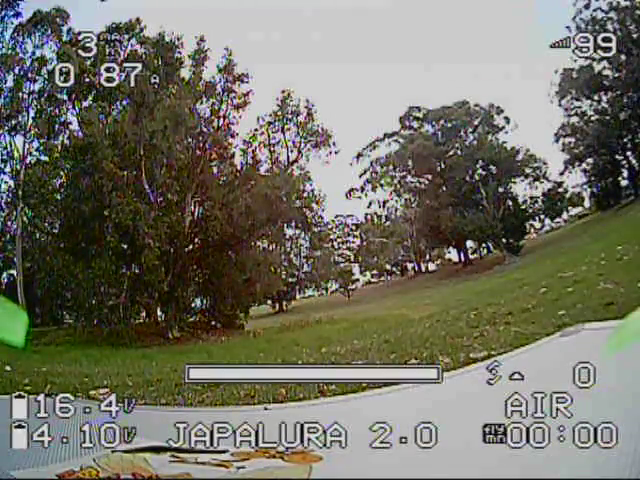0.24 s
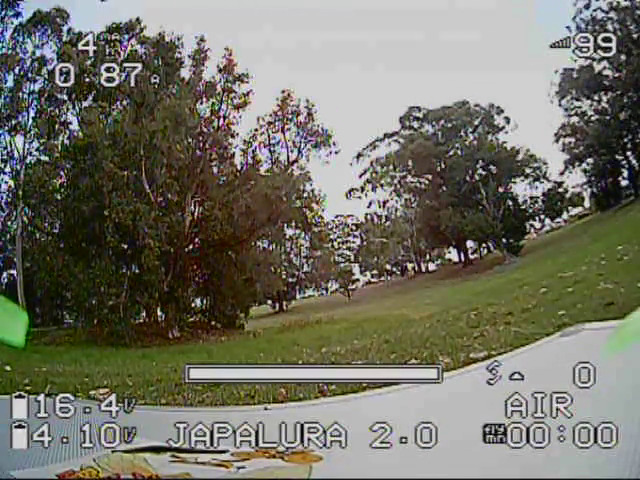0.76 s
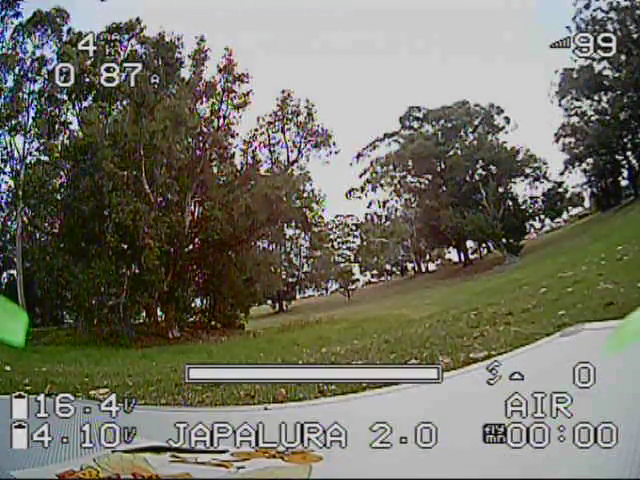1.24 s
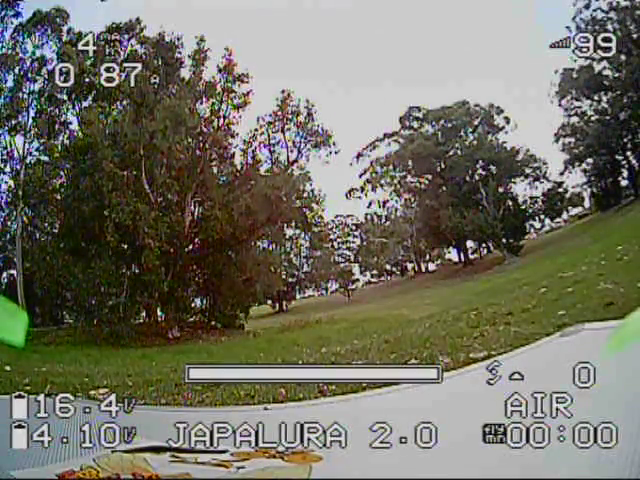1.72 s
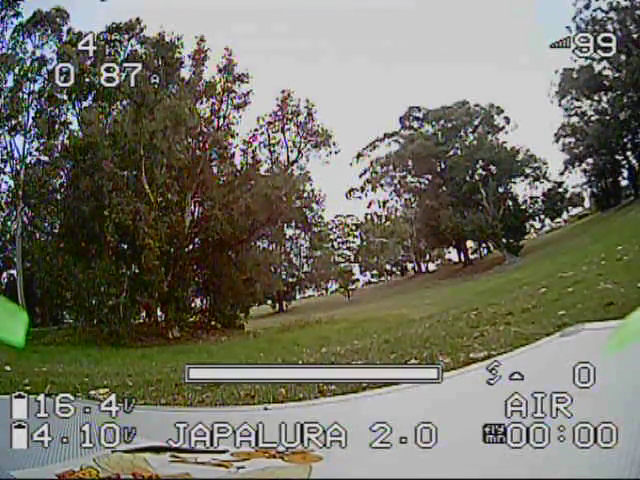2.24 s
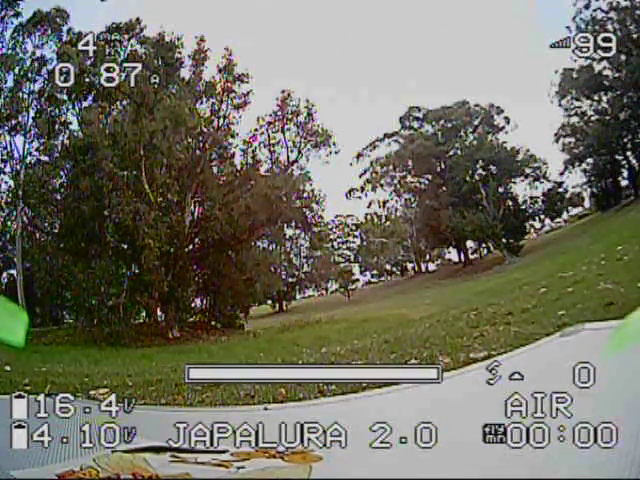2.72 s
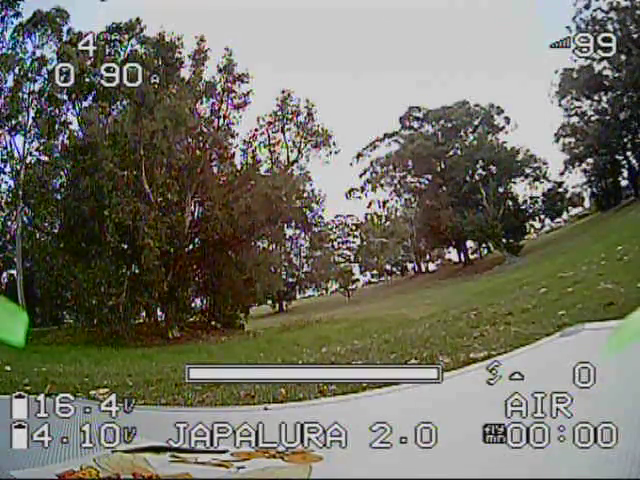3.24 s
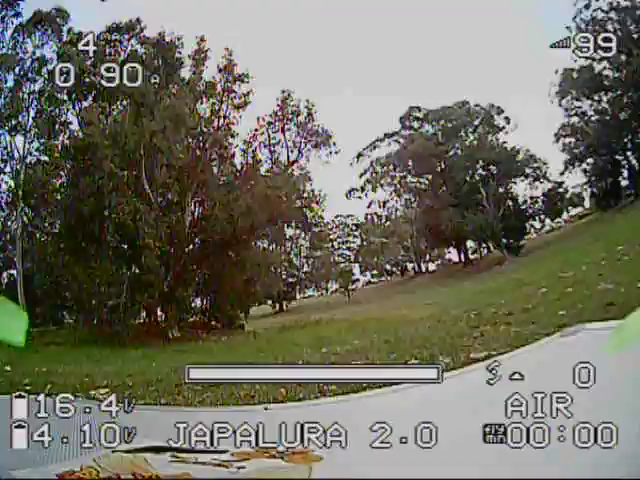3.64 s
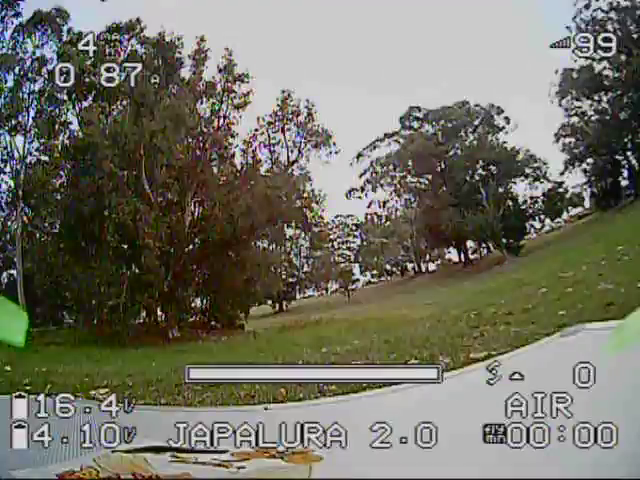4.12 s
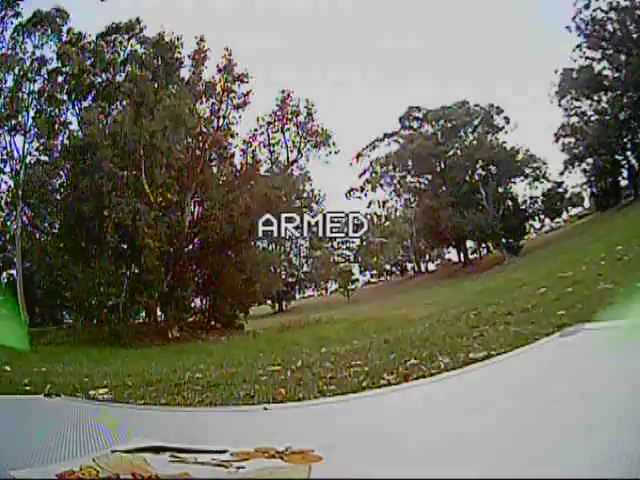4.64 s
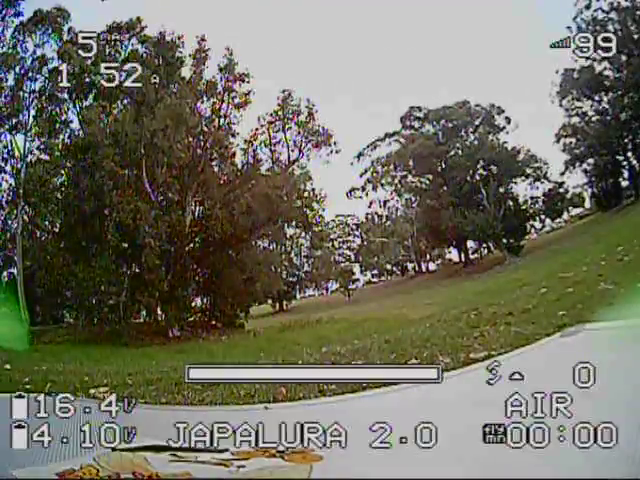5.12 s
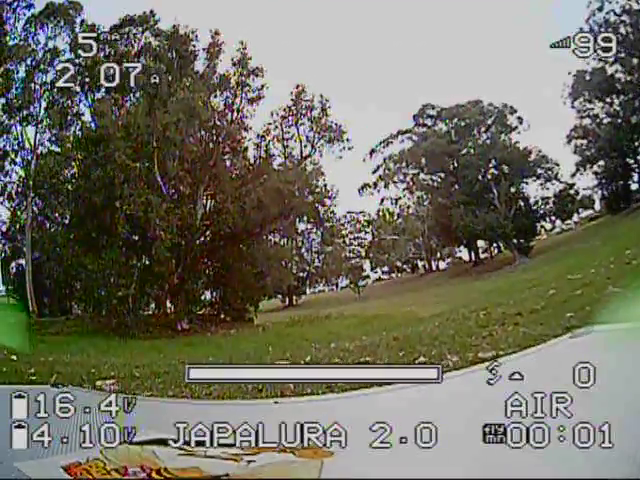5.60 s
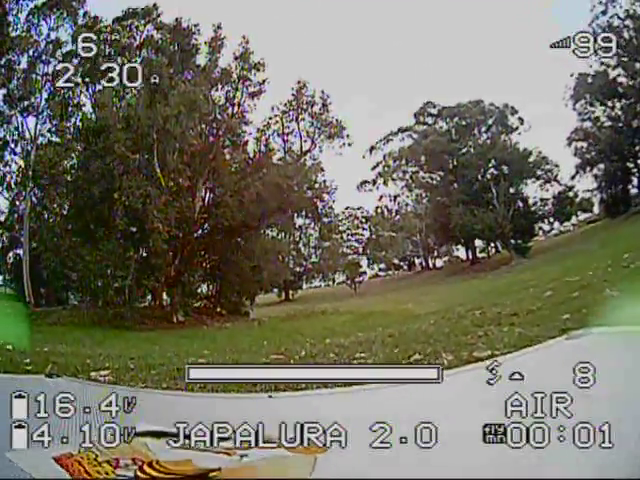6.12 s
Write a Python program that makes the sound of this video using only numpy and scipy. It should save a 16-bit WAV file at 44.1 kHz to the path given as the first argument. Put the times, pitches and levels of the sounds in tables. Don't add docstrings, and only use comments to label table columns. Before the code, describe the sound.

A small drone sits on the ground outdoors, but only its camera link is heard: a loud, continuous 50-hertz buzz, harsh and clipped, with dense fixed overtones and fine crackly grain. It swells in brightness briefly near two and three seconds, thins at about four and a half, then grows choppier to the end. The signal is direct, dry and mono, with no room or open air.

```python
import sys
import numpy as np
from scipy import signal
from scipy.io import wavfile

SR = 44100
rng = np.random.default_rng(int(sys.argv[2]) if len(sys.argv) > 2 else 0)


def dump_mix(stems):
    frames = np.atleast_2d(stems).T
    limited = np.clip(frames, -1, 1)
    pcm = np.round(limited * 32767).astype(np.int16)
    wavfile.write(sys.argv[1], SR, pcm)


def boost(x):
    u = np.asarray(x, float) / 20
    return 10 ** u


N = 280476

# time into the field in ms, level in V.
SCAN_LEVELS = [(4.6, 0.0), (6.9, -0.23), (8.15, -0.555), (8.9, -0.95), (10.35, -1.09), (10.9, -2.3),
               (13.75, -2.25), (14.15, -1.89), (18.5, -1.02)]
# in V, ms or share as noted.
CONTROL_SCATTER = [
    .015,
    .012,
    .14,
    .06,
    .17,
    .22,
    .5,
    .55,
    .14,
]
# time into the field in ms, grain in V.
DETAIL_GRAIN = [(4.3, .0), (5, .011), (7, .01), (9, .09), (10.6, .1), (11.5, .01), (13.6, .05),
                (14.3, .014), (20, .004)]
# time in seconds, glare in V.
EXPOSURE_DRIFT = [(0, -.024), (.2, .044), (.45, .005), (.9, -.03), (1.22, .049), (1.6, .005), (2.15, 0),
                  (2.36, -.17), (2.66, -.09), (2.86, -.02), (3.02, -.13), (3.3, .113), (3.45, .054),
                  (3.75, .005), (4.2, .042), (4.55, .064), (5.15, .022), (6.36, -.022)]
# start in s, rise in s, hold in s, release in s, extra glare in V.
EXPOSURE_FLARES = [
    (1.654, .066, .027, .064, .45),
    (1.89, .084, .074, .104, .39),
    (3.088, .044, .01, .102, .56),
]

FIELD_HZ, CONVERTER_HZ = 49.9502, 8000
WIPE_START_S, SPIN_START_S = 4.572, 5.12

GROUND_V, GROUND_PER_V = .174, -.85
BAR_V, BAR_PER_V = .42, .7
ROW2_V, ROW2_PER_V = .66, 2.6
ROW2_PLACE_MS, ROW2_PLACE_SPAN_MS = 2.33, .23
ROW3_PLACE_MS, ROW3_PLACE_MS_PER_V = 3.91, .52
ROW3_LEAST_V, ROW3_FULL_V, KNEE_V, KNEE_WIDTH_V = .09, 3.28, .1, .06
BEGINS_MS, BEGINS_MS_PER_V, BEGINS_MS_PER_DIM_V, STEADY_V = 18.15, 2.6, 4.6, .1

WIPED_GROUND_V, WIPED_BEGINS_MS, WIPED_PLACE_MS = .29, 18.3, 1.98
WIPED_ROW2_V, WIPED_ROW1_V, WIPED_BAR_V = .45, .12, .5

SPIN_ROW3_STEP_V, SPIN_ROW3_V, SPIN_ROW1_V, SPIN_ROW2_V, SPIN_BAR_V = .58, .8, 1.3, -.55, -.4
SPIN_PLACE_MS, SPIN_POWER = -.5, 1.6


def glare_at(s):
    glare = np.interp(s, *np.transpose(EXPOSURE_DRIFT))
    for start, rise, hold, release, volts in EXPOSURE_FLARES:
        rising = (s - start) / rise
        falling = 1 - (s - start - rise - hold) / release
        glare = glare + volts * np.clip(np.minimum(rising, falling), 0, 1)
    return glare


def layout(s):
    glare = glare_at(s)
    full = 1 / (1 + np.exp((KNEE_V - glare) / KNEE_WIDTH_V))
    spun = s >= SPIN_START_S
    spin = np.clip((s - SPIN_START_S) / (N / SR - SPIN_START_S), 0, 1) ** SPIN_POWER
    ground = GROUND_V + GROUND_PER_V * glare
    begins = BEGINS_MS + BEGINS_MS_PER_V * np.maximum(glare - STEADY_V, 0)
    begins = begins + BEGINS_MS_PER_DIM_V * np.minimum(glare, 0)
    place = ROW2_PLACE_MS + ROW2_PLACE_SPAN_MS * full + SPIN_PLACE_MS * spin
    row2 = ROW2_V + ROW2_PER_V * np.maximum(glare, -.03) + SPIN_ROW2_V * spin
    row3 = ROW3_LEAST_V + ROW3_FULL_V * full + SPIN_ROW3_STEP_V * spun + SPIN_ROW3_V * spin
    row1 = SPIN_ROW1_V * spin ** 1.5
    bar = BAR_V + BAR_PER_V * glare + SPIN_BAR_V * spin
    shown = [ground, glare, begins, place, row2, row3, row1, bar]
    wiped = np.array([WIPED_GROUND_V, 0, WIPED_BEGINS_MS, WIPED_PLACE_MS,
                      WIPED_ROW2_V, 0, WIPED_ROW1_V, WIPED_BAR_V])
    return np.where((s >= WIPE_START_S) & ~spun, wiped[:, None], shown)


def controls(t):
    field = np.maximum(np.floor(t * FIELD_HZ + .4).astype(int), 0)
    fields = field[-1] + 1
    held = layout(np.arange(fields) / FIELD_HZ)
    chance = rng.standard_normal((fields, len(CONTROL_SCATTER))).T * np.array(CONTROL_SCATTER)[:, None]
    held[:4] += chance[:4]
    held[4:] = np.maximum(held[4:], 0) * np.maximum(1 + chance[4:-1], 0)
    sway = chance[-1]
    return np.vstack([held, sway])[:, field]


def bump(ms, centre, width):
    return np.exp(-.5 * ((ms - centre) / width) ** 2)


def row(ms, centre, width):
    return bump(ms, centre, width * np.where(ms < centre, 1.3, .65))


def text_rows(ms, glare, place, row2, row3, row1, bar):
    row2_width = .285 + .12 * np.maximum(2.3 - place, 0)
    row3_place = ROW3_PLACE_MS + ROW3_PLACE_MS_PER_V * np.maximum(glare, 0)
    rows = row1 * row(ms, .89, .16)
    rows += row2 * row(ms, place, row2_width)
    rows += row3 * row(ms, row3_place, .245)
    rows += .15 * row2 * bump(ms, place - .6, .17)
    rows += bar * row(ms, 19.45, .2)
    return rows + .1 * bump(ms, 5.3, .1)


def grain(count):
    band = signal.butter(1, (220, 850), "band", fs=CONVERTER_HZ)
    mottle = signal.lfilter(*band, rng.standard_normal(count))
    specks = rng.standard_normal(count)
    spread_db = 3.0 * np.minimum(rng.exponential(1, count), 4)
    speck_hz = 2000
    pole = np.exp(-2 * np.pi * speck_hz / CONVERTER_HZ)
    specks = signal.lfilter([1], [1, -pole], specks * boost(spread_db))
    return mottle / mottle.std() + boost(-4) * specks / specks.std()


def picture(t):
    ms = t * FIELD_HZ % 1 * 1000 / FIELD_HZ
    ground, glare, begins, place, row2, row3, row1, bar, sway = controls(t)
    share = np.clip(np.maximum((4.6 - ms) / 1.5, (ms - begins) / .75 + .5), 0, 1)
    still = np.interp(ms + sway * bump(ms, 10.6, .7), *np.transpose(SCAN_LEVELS))
    level = still * (1 - share) + ground * share
    glare_shape = 1.55 * bump(ms, 3.1, .42) + .5 * bump(ms, .8, .8) + 1.1 * bump(ms, 5.45, 1.7)
    glare_shape += .3 * bump(ms, 13.6, .6) - bump(ms, 9.6, .9)
    level += glare * glare_shape
    rows = text_rows(ms, glare, place, row2, row3, row1, bar)
    detail = np.interp(ms, *np.transpose(DETAIL_GRAIN)) * (1 + 1.3 * glare)
    detail += .13 * rows ** .8
    detail += .15 * bump(ms, begins - .35, .6)
    return level - rows + detail * grain(len(t))


def coupling(volts):
    coupling_ms = 10
    keep = np.exp(-1000 / (coupling_ms * CONVERTER_HZ))
    return signal.lfilter([(1 + keep) / 2, -(1 + keep) / 2], [1, -keep], volts)


def converter(volts):
    up, down = 441, 80
    smooth = signal.firwin(numtaps=2 * 16 * up + 1, cutoff=4030, window=("kaiser", 6.6),
                           fs=CONVERTER_HZ * up)
    return signal.resample_poly(np.clip(volts, -1, 1), up, down, window=smooth)


def scene():
    lead = CONVERTER_HZ // 10
    t = np.arange(-lead, N * CONVERTER_HZ // SR + 40) / CONVERTER_HZ
    leak = coupling(picture(t))
    hiss = boost(-52) * rng.standard_normal(len(t))
    sound = converter(leak + hiss)
    return sound[None, lead * SR // CONVERTER_HZ:][:, :N]


def low_pass(x):
    return signal.sosfilt(signal.butter(12, 16000, fs=SR, output="sos"), x)


def record(dry):
    full_scale = .708
    mix = full_scale * np.clip(dry, -1, 1)
    return low_pass(mix)


dry = scene()
out = record(dry)
dump_mix(out)
```